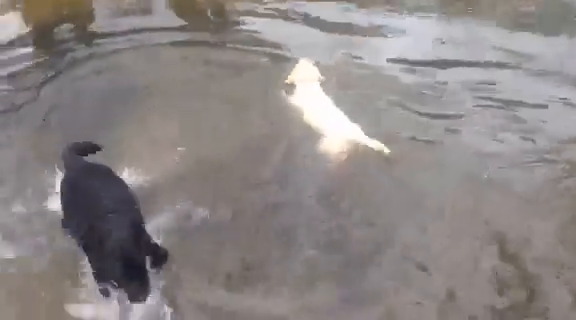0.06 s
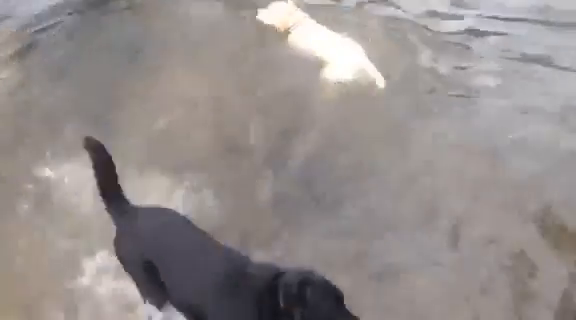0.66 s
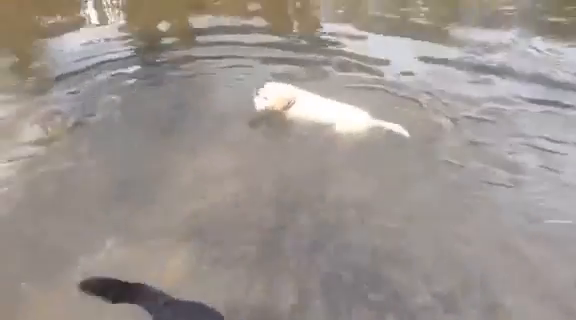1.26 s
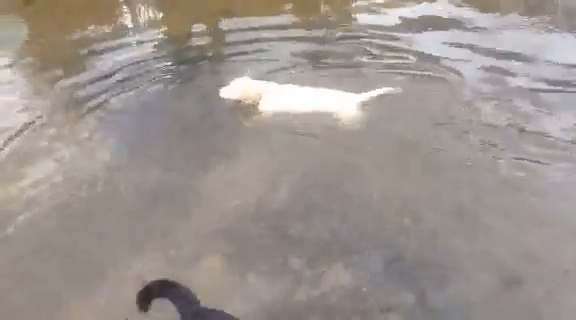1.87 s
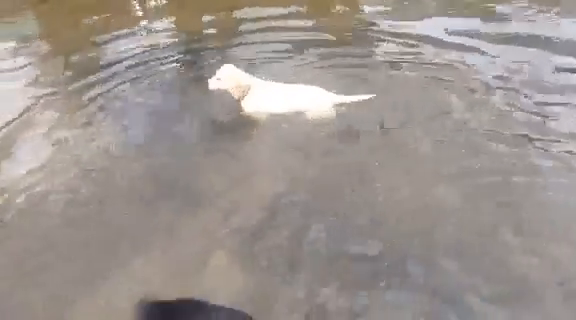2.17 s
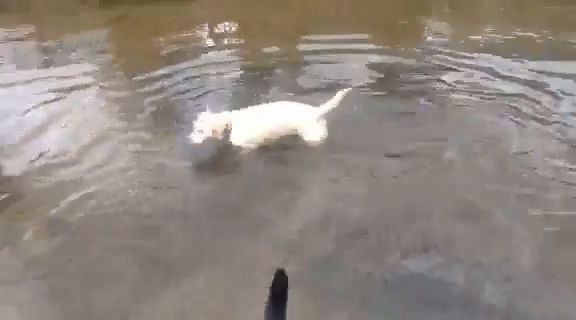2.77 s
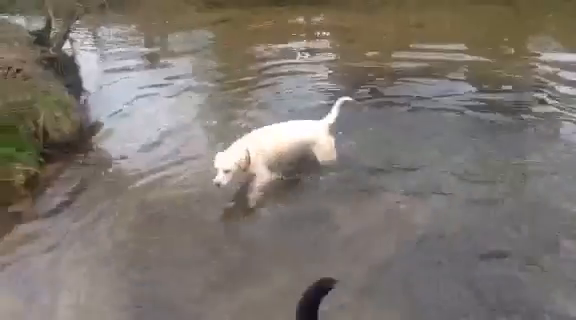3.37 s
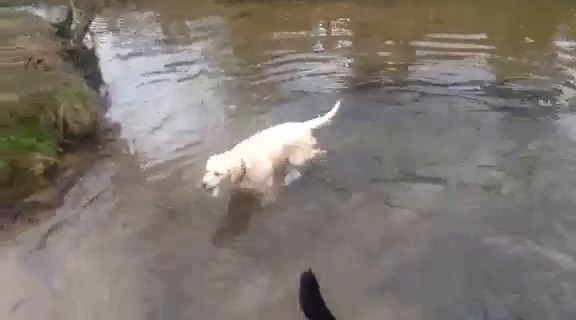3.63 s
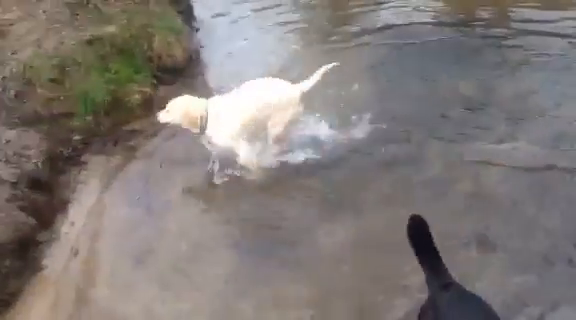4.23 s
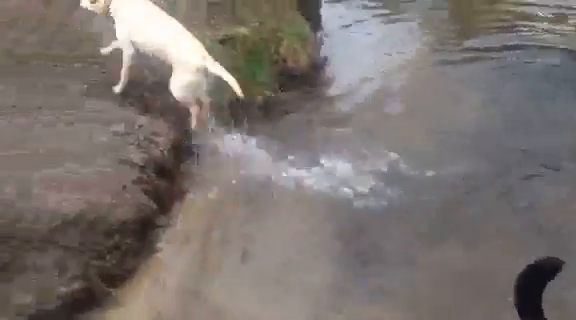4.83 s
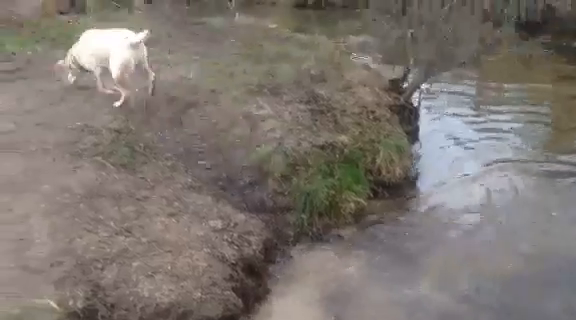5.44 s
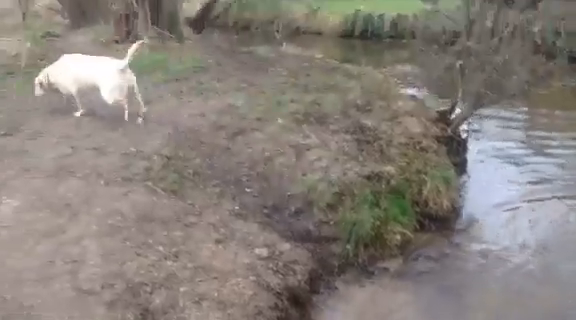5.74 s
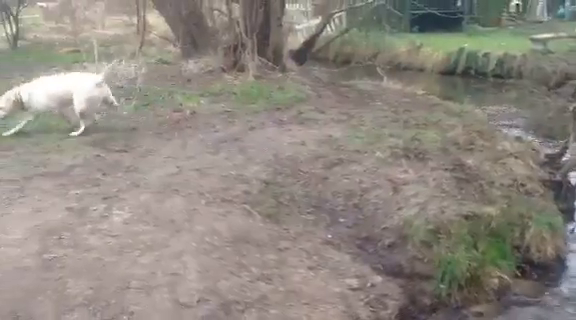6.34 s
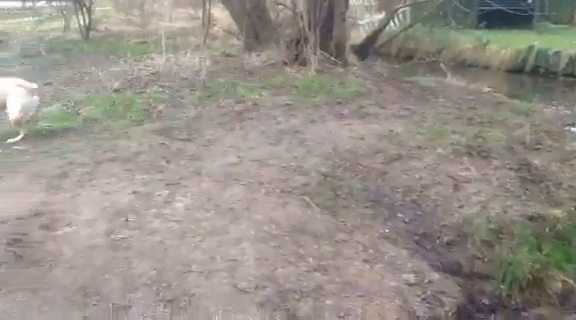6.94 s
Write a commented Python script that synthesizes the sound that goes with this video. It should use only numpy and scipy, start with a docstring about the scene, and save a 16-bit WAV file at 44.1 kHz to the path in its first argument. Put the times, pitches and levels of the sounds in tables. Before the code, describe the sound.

Dogs splash and slosh through shallow water, with plopping paws, a brief jingle of collar tags and light wind on the microphone.

```python
"""A splashy plunge close by: two dogs wade in a shallow river. One surges past, the other trots out to
the bank, then the wading swells again. Legs churn the water and each stride shoves a swell over it;
paws slap the surface and pull in pockets of air that plop, and spray falls back as fine drops.
Metal collar tags jingle a few times while a light wind buffets the single microphone."""
import sys
import numpy as np
from scipy import signal
from scipy.fft import rfft, irfft
from scipy.io import wavfile
from scipy.ndimage import uniform_filter1d

SR = 44100
rng = np.random.default_rng(int(sys.argv[2]) if len(sys.argv) > 2 else 0)


def log_audio(samples):
    """Write samples as a 16-bit WAV file to the path given in sys.argv[1]."""
    # one column per channel
    frames = np.atleast_2d(samples).T
    # limit to full scale, then quantise
    limited = np.clip(frames, -1, 1)
    pcm = np.round(limited * 32767).astype(np.int16)
    wavfile.write(sys.argv[1], SR, pcm)


N = 308700
T = np.arange(N) / SR


def gain_of(db):
    """Decibels to amplitude."""
    return 10 ** (np.asarray(db) / 20)


def unit_rms(x):
    """Scales to rms 1."""
    return x / np.sqrt(np.mean(x ** 2) + 1e-20)


def add(mix, s, sound):
    """Mixes a sound in at s seconds."""
    part = mix[max(round(s * SR), 0):][:len(sound)]
    part += sound[:len(part)]


def equalised(x, curve):
    """Shapes the tone with an EQ curve of (Hz, dB) points, to rms 1."""
    hz, db = np.transpose(curve)
    eq_db = np.interp(np.log(np.fft.rfftfreq(len(x), 1 / SR) + 1), np.log(hz), db)
    return unit_rms(irfft(rfft(x) * gain_of(eq_db), len(x)))


def pink_band(samples, hz, octaves):
    """Spectrum of a bell-shaped band around hz, on a pink slope."""
    freq = np.fft.rfftfreq(samples, 1 / SR) + 1
    return np.exp(-.5 * (np.log2(freq / hz) / octaves) ** 2) / np.sqrt(freq)


def levelled(x, seconds):
    """Rides out level swings slower than the given time."""
    size = max(int(seconds * SR), 2)
    power = uniform_filter1d(uniform_filter1d(x ** 2, size), size)
    return x / np.sqrt(abs(power) + 1e-6)


def wander(first, second):
    """Random modulation at rms 1: noise smoothed over two lengths in samples."""
    return unit_rms(uniform_filter1d(uniform_filter1d(rng.standard_normal(N), first), second))


# Fader ride of the breeze: t/s, level/dB
BREEZE_RIDE = [(0.0, -55), (0.31, -52.5), (1.07, -47.5), (1.361, -50.5), (1.73, -49), (1.91, -48.5),
               (2.22, -54), (2.73, -54.5), (3.37, -58), (3.65, -48.5), (3.82, -54.5), (5.42, -55.5),
               (5.56, -54), (5.83, -57), (6.24, -57), (6.57, -57.5), (7.0, -56.5)]
# EQ of the wind pressure: f/Hz, relative level/dB
RUMBLE_EQ = [(15, -20.5), (32, -13), (55, -2.5), (80, -2), (130, -0.5), (175, -0.5), (240, -5.5),
             (320, -14.5), (600, -29.5), (1500, -60.5)]


def wind(trim_db=2.0, lumps_db=3.0, crossover_hz=220, neutral_db=-51.5, brighten_db_per_db=0.61):
    """A bed of low rumble, louder and brighter as the breeze grows, made lumpy by small eddies."""
    strength_db = np.interp(T, *np.transpose(BREEZE_RIDE))
    lumps = gain_of(lumps_db * wander(1000, 600))
    rumble = levelled(equalised(rng.standard_normal(N), RUMBLE_EQ) * lumps, seconds=0.18)
    deep = signal.sosfiltfilt(signal.butter(3, crossover_hz, fs=SR, output="sos"), rumble)
    flutter = (rumble - deep) * gain_of(brighten_db_per_db * (strength_db - neutral_db))
    return gain_of(trim_db + strength_db) * (deep + flutter)


# Wind bumps on the microphone: t/s, level/dB, half length/s, flutter f/Hz
EDDY_BUMPS = [(0.014, -43, 0.025, 170), (.09, -43, 0.0089, 225), (0.192, -43.5, 0.012, 128),
              (0.371, -35, 0.0083, 125), (0.425, -34, 0.0086, 86), (0.663, -28, 0.007, 145),
              (.79, -44, 0.0069, 225), (1, -37.5, 0.011, 85), (1.037, -36, 0.017, 111),
              (1.077, -29, 0.017, 148), (1.177, -37, 0.013, 89.5), (1.348, -36, 0.0057, 96),
              (1.381, -32.5, 0.004, 91), (1.502, -29, 0.011, 93.5), (1.577, -39.5, 0.014, 210),
              (1.602, -35, 0.015, 108), (1.698, -43, 0.024, 118), (1.9, -42, 0.0052, 225),
              (2.017, -28, 0.0058, 97), (2.051, -41, 0.018, 99), (2.133, -47.5, 0.019, 87),
              (2.237, -45.5, 0.015, 101), (2.722, -39.5, 0.013, 113), (2.88, -40, 0.032, 126),
              (3.769, -39, 0.0044, 176), (3.83, -41.5, 0.0087, 116), (4.087, -46.5, 0.029, 113),
              (5.348, -49, 0.056, 90), (5.85, -41, 0.0088, 72), (5.955, -49.5, 0.031, 65),
              (6.417, -45, 0.032, 116), (6.615, -47, 0.03, 100), (6.842, -46, 0.021, 101)]


def eddies():
    """Each strong eddy shakes the air in the microphone port for a few cycles."""
    out, t = np.zeros(N), T[:8192] - T[4096]
    for s, db, half_s, hz in EDDY_BUMPS:
        band = pink_band(len(t), hz, octaves=0.6)
        flutter = levelled(irfft(rfft(rng.standard_normal(len(t))) * band), seconds=2 / hz)
        push = np.exp(-.5 * (t / half_s) ** 2)
        out += np.interp(T, s + t, gain_of(db) * flutter * push, left=0, right=0)
    return out


# Collar tag hits: t/s, clatter level/dB, favoured f/Hz, ring level/dB
TAG_HITS = [(1.757, -53.5, 5500, -64), (1.769, -53.5, 6000, -48), (1.827, -57, 7000, -51),
            (1.923, -56, 6200, -62), (1.9462, -46, 6600, -66), (1.9489, -44, 5400, -54),
            (1.997, -68, 7000, -52), (2.1364, -43, 6400, -31), (2.143, -55, 7400, -27),
            (2.3255, -40.5, 7500, -48), (2.344, -50, 7000, -35), (2.522, -54, 5800, -62),
            (2.698, -68, 7000, -47.5), (6.438, -55, 7000, -49), (6.464, -64, 7000, -51)]
# Choked modes of the tags pressed together: f/Hz, relative level/dB, t60/s
CHOKED_MODES = [(4990, 3.5, 0.028), (5340, -3, 0.013), (6570, -1, 0.025), (7400, -3, 0.023)]
# Open modes of the tags swinging free: f/Hz, relative level/dB, t60/s
OPEN_MODES = [(7005, 0, .044), (7960, -10, .085)]


def collar_tags(contact_s=0.0027, contact_width_hz=1000, release_s=0.0028,
                click_db=9, click_s=.0004, click_hz=6900):
    """Metal discs meet with a click, chatter for a few milliseconds, then ring on freely."""
    out, t = np.zeros(N), T[:8192]
    click = gain_of(click_db) * np.exp(-t / click_s) * np.sin(2 * np.pi * click_hz * t)
    release = 1 - np.exp(-t / release_s)
    for s, clatter_db, favoured_hz, ring_db in TAG_HITS:
        contacts = rng.standard_normal(len(t)) * np.exp(-((t - contact_s) / contact_s) ** 2)
        clatter = np.zeros(len(t))
        for hz, db, t60 in CHOKED_MODES:
            mode = gain_of(-60 * t / t60) * np.sin(2 * np.pi * hz * t)
            weight = gain_of(db) / (1 + ((hz - favoured_hz) / contact_width_hz) ** 2)
            clatter += weight * unit_rms(signal.fftconvolve(contacts, mode)[:len(t)])
        clatter /= np.std(clatter[:SR // 100])  # the first 10 ms set the level
        ring = sum(gain_of(db - 60 * t / t60) * np.sin(2 * np.pi * (hz * t + rng.random()))
                   for hz, db, t60 in OPEN_MODES)
        add(out, s, gain_of(clatter_db) * (click + clatter) + gain_of(ring_db) * ring * release)
    return out


# Fader rides of the stirred water: t/s, splash level/dB, spray level/dB, churn level/dB
WATER_RIDES = [(0.0, -52, -56.5, -59), (0.8, -54, -56.5, -52), (1.01, -55.5, -58.5, -58.5),
               (1.56, -59.5, -63.5, -59.5), (2.03, -54.5, -60, -61), (2.44, -59, -61.5, -55.5),
               (2.73, -59, -63.5, -60), (3.41, -56, -61.5, -56.5), (4.05, -61.5, -70, -63.5),
               (4.58, -54, -59.5, -54.5), (4.95, -54.5, -60.5, -61), (5.26, -63.5, -67, -64.5),
               (5.75, -60, -68.5, -63.5), (6.28, -54, -58, -57), (6.43, -48.5, -62.5, -58.5),
               (6.68, -55.5, -59.5, -64), (7.0, -54, -49.5, -60.5)]


def stirring(s):
    """How hard the dogs keep the water stirred at s seconds: splash, spray and churn in dB."""
    times, *rides = np.transpose(WATER_RIDES)
    return [np.interp(s, times, db) for db in rides]


# Waves shoved by a leg or chest: t/s, splash level/dB, half length/s, depth/dB (more churn, less spray)
STRIDE_SWELLS = [(0.036, -50.5, 0.11, 6), (0.391, -48.5, 0.056, 0), (0.656, -52, 0.075, 3),
                 (0.762, -53, 0.034, -3.5), (1.277, -62.5, 0.075, 5), (1.567, -70.5, 0.024, 19.5),
                 (1.997, -58, 0.017, 1), (2.456, -59, 0.1, -2), (2.63, -63.5, 0.028, -9),
                 (3.58, -57, 0.027, 4), (3.72, -58, 0.087, 0.5), (4.046, -58, 0.13, 6.5),
                 (4.314, -54, 0.077, 2), (4.407, -55, 0.039, 6.5), (4.47, -60, 0.028, 10),
                 (4.577, -58, 0.045, 8), (4.672, -51, 0.029, 4.5), (5.026, -62, 0.052, -5.5),
                 (5.775, -59, 0.085, 4), (5.9, -69, 0.049, -13), (6.078, -56.5, 0.058, -8),
                 (6.303, -55, 0.056, -8), (6.528, -52, 0.11, -4.5), (6.81, -55, 0.057, -2)]


def strides(lap_s=.05, lap_db=2, churn_trim_db=-2, spray_trim_db=-4, lead_s=0.0075, lag_s=0.0041):
    """Gains of churn, splash and spray: each stride swells over the randomly lapping water."""
    splash_db, spray_db, churn_db = stirring(T)
    ripples_db = lap_db * np.interp(T / lap_s, np.arange(1024), rng.standard_normal(1024))
    power = gain_of([churn_db + ripples_db, splash_db + ripples_db, spray_db]) ** 2
    for s, db, half_s, depth_db in STRIDE_SWELLS:
        peaks = [(s - lead_s, db + churn_trim_db + depth_db),  # the leg churns,
                 (s, db),  # the wave breaks,
                 (s + lag_s, db + spray_trim_db - depth_db)]  # the spray lands
        near = abs(T - s) < 10 * half_s
        for layer, (peak_s, peak_db) in zip(power, peaks):
            layer[near] += gain_of(peak_db) ** 2 * np.exp(-((T[near] - peak_s) / half_s) ** 2)
    return np.sqrt(power)


def bubbles(low_hz, high_hz, per_s, cycles, rise, sizes):
    """A swarm of bubbles; each rings briefly and rises in pitch as it nears the surface."""
    out = np.zeros(N)
    for hz in np.geomspace(low_hz, high_hz, sizes):
        chance, place, strength = rng.random((4000, 3)).T
        strength_db = 3.5 * np.minimum(-np.log(strength), 4)
        sounding = chance < per_s * T[-1] / sizes / len(chance)
        births = np.zeros(N)
        births[(place * (N - 1)).astype(int)] = gain_of(strength_db) * sounding
        age = T[:int(2 * cycles / hz * SR) + 2] * hz / cycles  # 1 after `cycles` periods
        envelope = np.exp(-np.pi * age) * (1 - np.exp(-age * cycles))
        ring = envelope * np.sin(2 * np.pi * cycles * age * (1 + rise * age))
        out += np.sqrt(hz) * unit_rms(signal.oaconvolve(births, ring)[:N])
    return unit_rms(out)


def in_hiss(swarm, bubble_share, patch_db, flicker_db):
    """Sinks bubbles into a watery hiss: flickering noise with a random, patchy warble."""
    real, imag, patches = rng.standard_normal((3, N // 256 + 5, 513))
    patches = unit_rms(uniform_filter1d(uniform_filter1d(patches, size=5, axis=0), size=5, axis=1))
    spectrogram = (real + 1j * imag) * gain_of(patch_db * patches)
    noise = signal.istft(spectrogram.T, nperseg=1024, noverlap=768)[1][:N]
    hiss = unit_rms(noise * gain_of(flicker_db * wander(400, 200)))
    return np.sqrt(bubble_share) * swarm + np.sqrt(1 - bubble_share) * hiss


# EQs of the water's low gurgle, mid splash and top fizz: f/Hz, relative level/dB
CHURN_EQ = [(120, -25), (250, 3.5), (380, 2.5), (600, 2.5), (850, 1), (1300, -21), (2600, -37)]
SPLASH_EQ = [(300, -19), (700, -3), (1000, 1.5), (1500, 1), (2100, -1.5), (2550, -4.5), (2900, -25.5),
             (4500, -29), (8000, -49.5)]
SPRAY_EQ = [(1500, -6.5), (2600, -0.5), (3250, 1.5), (4200, 1.5), (5100, -0.5), (6000, -2.5), (7600, -5),
            (8000, -28)]


def wading(churn_db=-1.5, splash_db=0.03, spray_db=0.52, ticks_db=-11.5):
    """Big bubbles gurgle around the legs, small ones splash at the surface, and spray ticks down."""
    churn_gain, splash_gain, spray_gain = strides()
    big = bubbles(259.0, 1086, per_s=240, cycles=20.6, rise=0.039, sizes=24)
    churn = in_hiss(big, bubble_share=0.11, patch_db=4.4, flicker_db=0.94)
    small = bubbles(770.3, 2836, per_s=800, cycles=67.0, rise=0.024, sizes=40)
    splash = in_hiss(small, bubble_share=0.087, patch_db=4.35, flicker_db=0.52)
    # Droplets ring for so few cycles that they crackle rather than ping.
    droplets = bubbles(2800, 7800, per_s=3600, cycles=9, rise=0.033, sizes=36)
    spray = in_hiss(droplets, bubble_share=0.044, patch_db=4.36, flicker_db=1.0)
    ticks = bubbles(1200, 5500, per_s=220, cycles=4, rise=.02, sizes=12)
    return (churn_gain * gain_of(churn_db) * equalised(churn, CHURN_EQ)
            + splash_gain * gain_of(splash_db) * equalised(splash, SPLASH_EQ)
            + spray_gain * (gain_of(spray_db) * equalised(spray, SPRAY_EQ) + gain_of(ticks_db) * ticks))


# Paws and falling sheets of water hit the surface: t/s, level/dB, decay/s, centre f/Hz
SLAP_HITS = [(.178, -36, 0.007, 2600), (0.194, -45, 0.024, 2950), (0.379, -41, 0.0017, 4000),
             (0.393, -36, 0.0072, 2740), (0.396, -50, 0.0029, 5000), (0.415, -40, .003, 1800),
             (0.514, -43.5, 0.0078, 1900), (0.631, -49, 0.0056, 3600), (0.691, -39.5, 0.006, 1900),
             (0.701, -41, 0.0054, 4450), (.712, -44, .018, 1800), (0.78, -43.5, 0.051, 1700),
             (0.868, -47, .004, 1780), (0.914, -45, 0.0058, 2600), (1.032, -46, 0.0028, 1300),
             (1.263, -51, .004, 3000), (1.917, -42.5, 0.0027, 1900), (1.996, -46, 0.005, 1500),
             (2.056, -49, .002, 3500), (2.196, -48, 0.0086, 1470), (2.251, -48.5, 0.0035, 3300),
             (2.373, -48, 0.018, 2600), (3.166, -49, 0.0056, 1200), (3.263, -48, 0.0058, 1000),
             (3.322, -45.5, 0.025, 850), (3.332, -43.5, 0.006, 1150), (3.349, -49, 0.017, 1700),
             (3.383, -50, .004, 2000), (3.935, -51, .008, 1380), (4.114, -56, 0.0045, 970),
             (4.376, -50, 0.013, 3180), (4.387, -44, 0.0062, 1100), (4.466, -53, .004, 1500),
             (4.526, -51, 0.0038, 1810), (4.642, -49, 0.0026, 1800), (4.68, -46, 0.0055, 1400),
             (4.763, -37, 0.003, 3020), (4.7633, -39.5, 0.0035, 1300), (4.7743, -39.5, 0.003, 2800),
             (4.787, -48.5, 0.031, 3400), (4.884, -45.5, .003, 2200), (4.966, -49, 0.0048, 1810),
             (5.13, -52, 0.0053, 3000), (5.488, -47.5, 0.0067, 1120), (5.541, -53.5, .005, 1290),
             (5.996, -46, 0.0055, 1200), (6.027, -51, .004, 2200), (6.106, -38.5, 0.0059, 1550),
             (6.213, -47.5, 0.016, 2000), (6.283, -44, 0.0051, 2400), (6.304, -38.5, 0.0023, 3570),
             (6.337, -41.5, .003, 1710), (6.486, -44.5, 0.02, 2090), (6.506, -42, 0.0028, 2400),
             (6.559, -47, 0.0065, 1700), (6.72, -55, 0.0025, 2210), (6.841, -46.5, 0.0032, 4600),
             (6.907, -49, 0.0024, 2400)]


def slaps(grain_db=13.5, crack_db=5):
    """A crack on the surface and a burst of droplets that thins out; longer slaps build more slowly."""
    out, t = np.zeros(N), T[:8192]
    for s, db, decay_s, hz in SLAP_HITS:
        noise, grain = rng.standard_normal((2, len(t)))
        droplets = noise * gain_of(grain_db * unit_rms(uniform_filter1d(grain, size=30)))
        band = pink_band(len(t), hz, octaves=0.82)
        burst = levelled(irfft(rfft(droplets) * band), seconds=0.0011)
        envelope = (1 - np.exp(-10 * t / decay_s)) * np.exp(-t / decay_s)
        crack = np.roll(irfft(band), SR // 1000)  # peaks 1 ms in
        slap = burst * envelope / envelope.max() + gain_of(crack_db) * crack / crack.max()
        add(out, s, gain_of(db) * slap)
    return out


def drips(per_s=1.1, trim_db=-2.5, spread_db=1.5, low_hz=870, high_hz=2650, swell_s=0.0028):
    """Cues for plops(): stray drops fall at random, louder where the water is stirred harder."""
    count = 120
    chance, place, size, pitch, bend = rng.random((count, 5)).T
    s = place * T[-1]
    db = stirring(s)[0] + trim_db + spread_db * (2 * size - 1)
    hz = low_hz * (high_hz / low_hz) ** pitch
    octaves_per_s = 12 * bend
    cues = np.transpose([s, db, hz, np.full(count, swell_s), octaves_per_s])
    return list(cues[chance < per_s * T[-1] / count])


# Low plops under paws, high plinks under drops: t/s, level/dB, f/Hz, swell/s, bend/(octaves per s)
AIR_POCKETS = [(.024, -39, 435, 0.004, 5), (.084, -43.5, 947, 0.0074, 7), (.177, -40, 2415, 0.0026, 5),
               (.206, -47, 770, .004, 6), (.251, -43.5, 1400, 0.0035, 5), (.335, -38, 296, 0.0072, 12),
               (.347, -36, 414, 0.0087, 22), (.353, -33.5, 660, 0.0042, 7), (.394, -37.5, 1270, .003, -4),
               (.474, -40.5, 1210, 0.0057, -5), (.583, -42, 310, 0.0041, 7), (.714, -43, 980, 0.0038, 6),
               (.783, -44.5, 1366, .004, 9), (.857, -44, 1547, .0064, 4), (.931, -48, 3200, 0.0061, 4),
               (.975, -47, 2240, 0.0038, 5), (1.540, -51, 2820, .003, 5), (1.71, -44, 2820, 0.0028, 6),
               (2.089, -42, 408, 0.0043, 2), (2.198, -48, 780, 0.0066, 11), (3.325, -35.5, 595, 0.004, 10),
               (3.331, -42, 1290, .0033, 8), (3.348, -40.5, 583, 0.0041, 10),
               (3.380, -48, 2180, 0.0028, -12), (3.516, -40.5, 390, 0.0066, 5),
               (3.596, -38, 292, 0.0073, 4), (3.674, -49, 1820, .0033, -6), (3.742, -50, 2300, .0033, 6),
               (4.112, -34.5, 361, 0.0048, 3), (4.113, -42, 1050, 0.0032, 6),
               (4.263, -42, 1724, 0.0061, -1), (4.273, -44, 1160, 0.0038, -25),
               (4.294, -41.5, 404, 0.012, 11), (4.328, -45, 2940, .005, 1), (4.331, -45, 466, 0.0053, 4),
               (4.351, -46, 320, 0.0073, 9), (4.388, -44.5, 750, 0.0047, 12), (4.468, -51, 472, 0.013, -10),
               (4.528, -30.5, 399, 0.0084, 9), (4.558, -43, 494, 0.0029, 20),
               (4.582, -42.5, 1440, 0.005, -5), (4.618, -47.5, 3330, 0.0033, 8),
               (4.640, -40, 1930, 0.0024, 10), (4.681, -40.5, 483, 0.0078, 17),
               (4.701, -39.5, 717, 0.0044, 23), (4.708, -41.5, 1010, 0.008, 0),
               (4.763, -46, 3140, 0.0038, 4), (4.772, -37, 1235, 0.0027, 8), (4.953, -48, 1640, 0.0044, 15),
               (4.979, -47.5, 3280, 0.0025, 6), (5.848, -38, 309, 0.0054, 4), (6.036, -41.5, 2240, .003, 6),
               (6.108, -46, 860, 0.0038, 10), (6.242, -41, 510, 0.0033, 8), (6.260, -39.5, 480, 0.0047, 12),
               (6.278, -41.5, 2120, 0.0023, 6), (6.511, -39.5, 845, 0.0085, -5),
               (6.811, -47, 1700, 0.0038, 8), (6.966, -41, 2470, 0.0029, 10)]


def plops(wobble_hz=50, sharpness=2.48, foam_db=-15, foam_width_hz=900):
    """Trapped air swells, throbs and bends in pitch as it changes shape; the torn water around foams."""
    out, t = np.zeros(N), T[:4096]
    wobble = unit_rms(uniform_filter1d(rng.standard_normal(N + len(t)), size=60))
    foam_filter = signal.butter(2, foam_width_hz, fs=SR, output="sos")
    foam = unit_rms(signal.sosfilt(foam_filter, rng.standard_normal(N + len(t))))
    for s, db, hz, swell_s, bend in list(AIR_POCKETS) + drips():
        span = round(s * SR) + np.arange(len(t))
        pitch_hz = hz * 2 ** (bend * (t - swell_s)) + wobble_hz * wobble[span]
        tone = np.sin(2 * np.pi * np.cumsum(pitch_hz) / SR)
        envelope = (t / swell_s * np.exp(1 - t / swell_s)) ** sharpness
        roughness = 1 + gain_of(foam_db) * foam[span]
        add(out, s, gain_of(db) * envelope * roughness * tone)
    return out


def scene():
    """Open air without echo; one microphone feeds both channels."""
    mono = wading() + slaps() + plops() + wind() + eddies() + collar_tags()
    return np.array([mono, mono])


def record(dry, notch_hz=2850, notch_width_hz=170, notch_db=-4, high_cut_hz=8130):
    """The microphone has a narrow dip in the upper mids; a steep high cut follows."""
    hz = np.fft.rfftfreq(N, 1 / SR)
    notch = gain_of(notch_db * np.exp(-((hz - notch_hz) / notch_width_hz) ** 2))
    dipped = irfft(rfft(dry) * notch, N)
    high_cut = signal.firwin(601, high_cut_hz, window=("kaiser", 8), fs=SR)
    return signal.oaconvolve(dipped, high_cut[None], "same")


dry = scene()
out = record(dry)
log_audio(out)
```